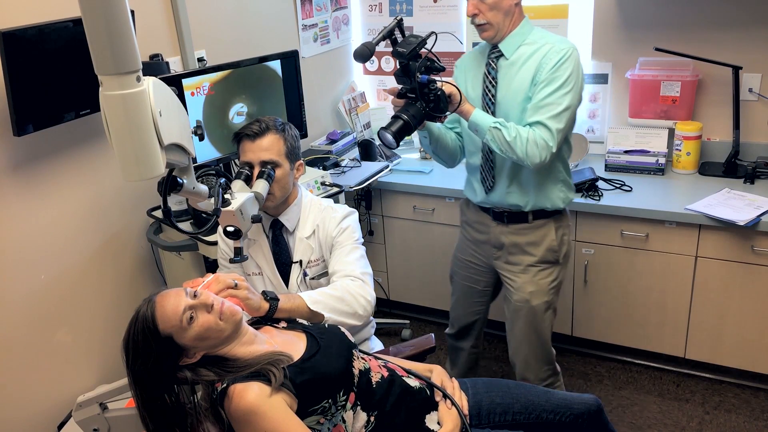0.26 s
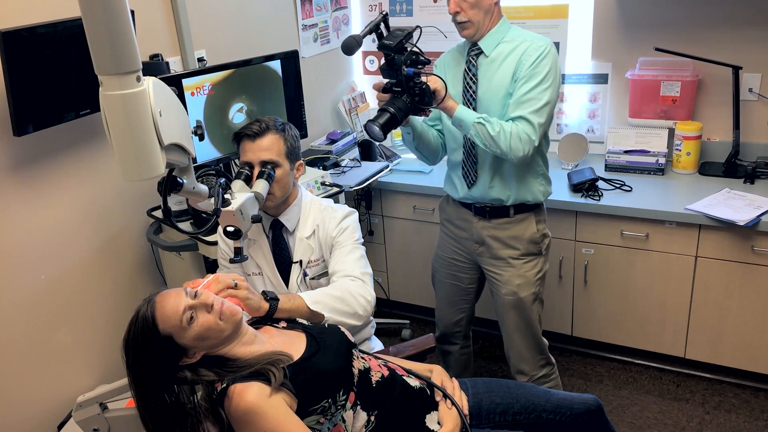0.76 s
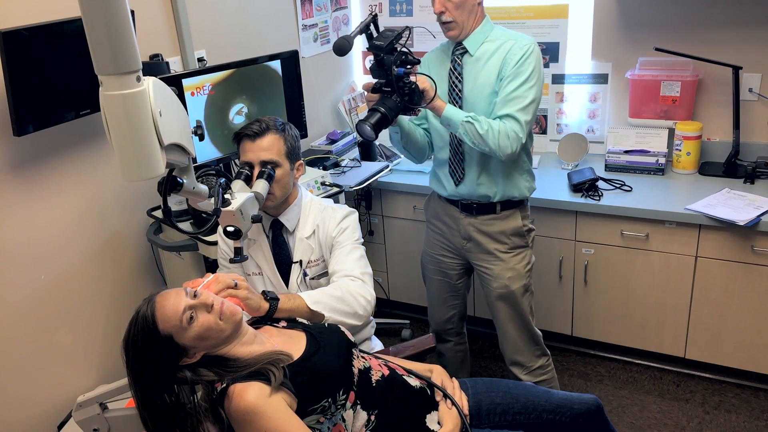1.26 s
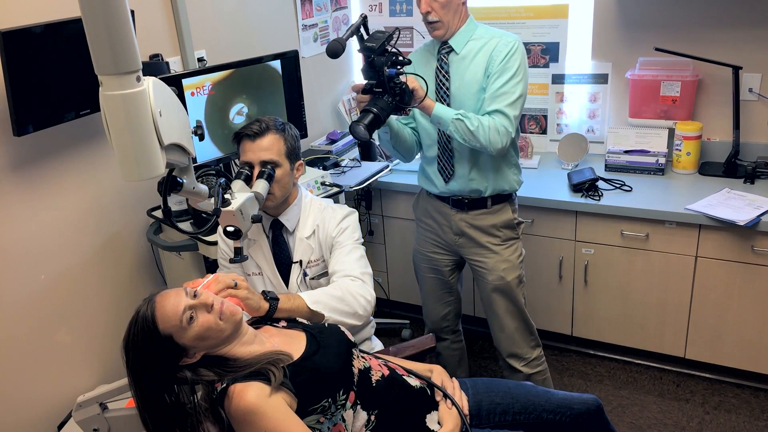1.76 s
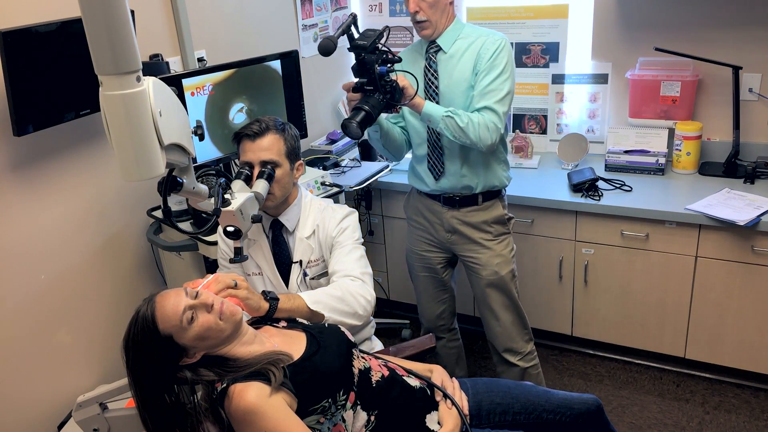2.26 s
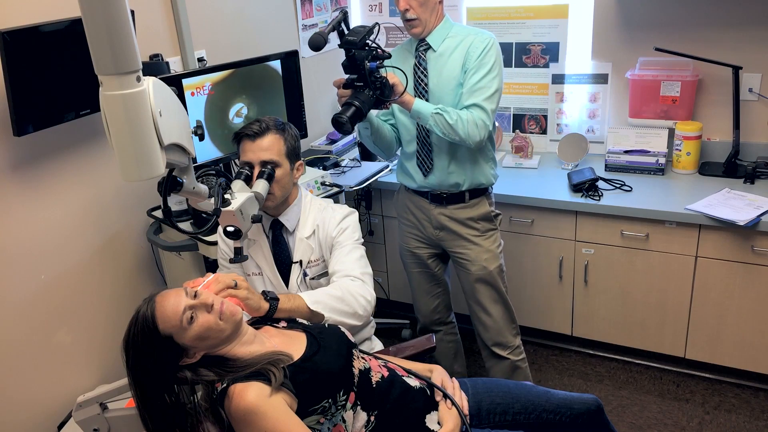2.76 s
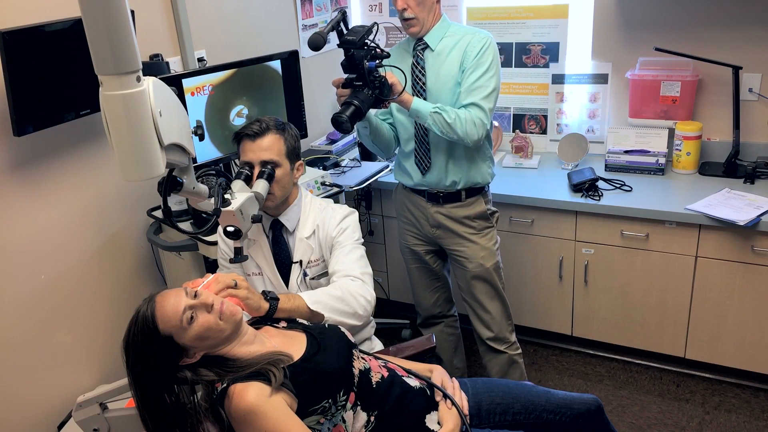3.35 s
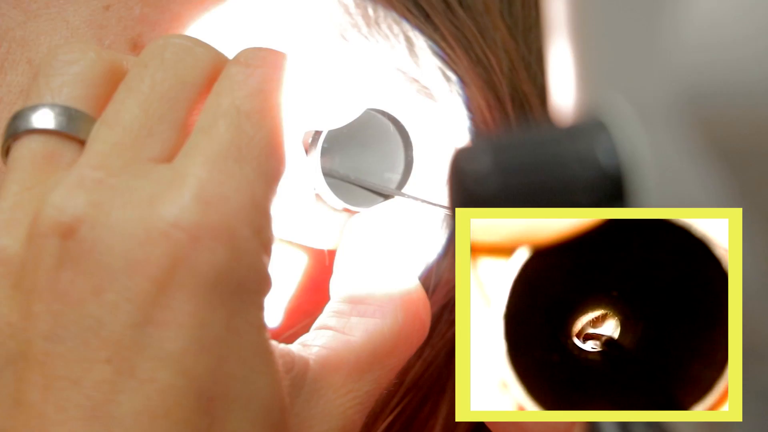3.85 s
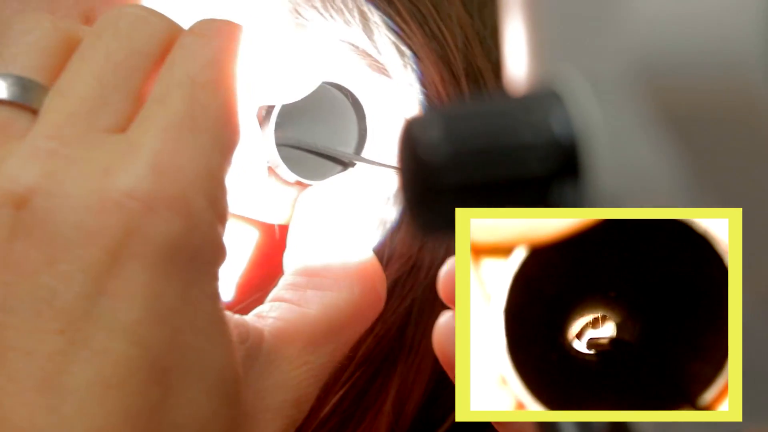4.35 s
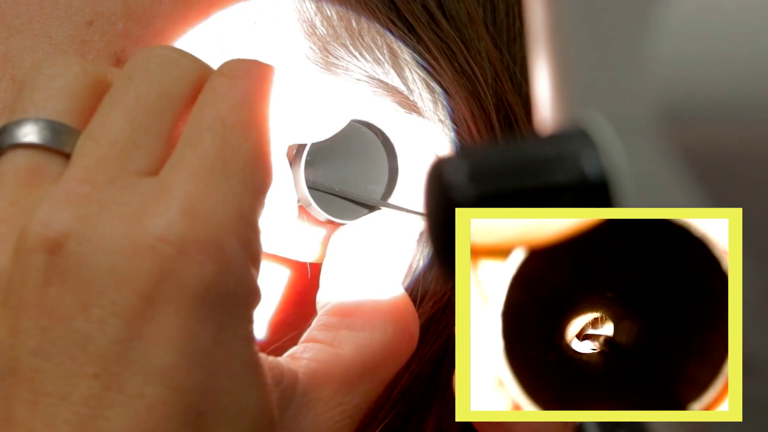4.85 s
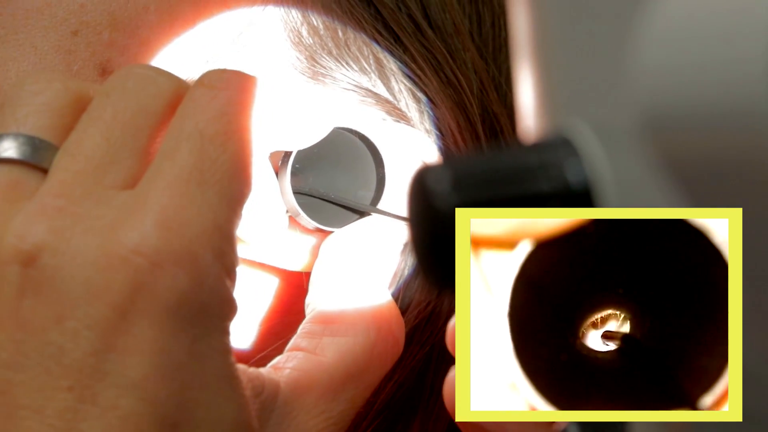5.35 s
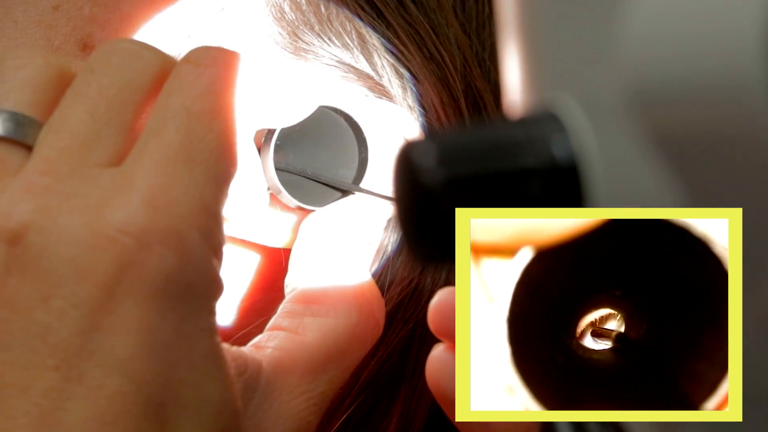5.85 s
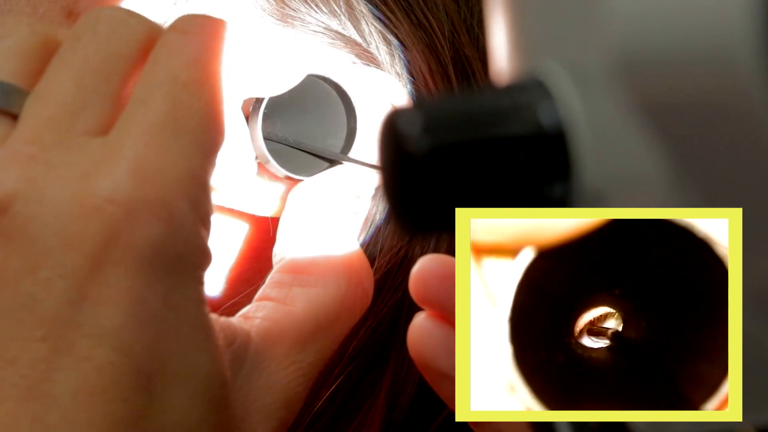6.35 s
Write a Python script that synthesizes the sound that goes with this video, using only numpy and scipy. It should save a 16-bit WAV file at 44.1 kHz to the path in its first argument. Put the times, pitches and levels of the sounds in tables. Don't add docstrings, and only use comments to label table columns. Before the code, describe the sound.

A fine suction tip hisses and sputters wetly in a small clinic room, with crackling bursts over a low steady pump drone.

```python
import sys
import numpy as np
from scipy import signal
from scipy.fft import rfft, irfft
from scipy.io import wavfile
from scipy.ndimage import uniform_filter1d, map_coordinates

SR = 44100
rng = np.random.default_rng(int(sys.argv[2]) if len(sys.argv) > 2 else 0)


def rack_gain(trim_db):
    fader = np.asarray(trim_db, float)
    return 10 ** (fader / 20)


def put_to_file(sound):
    columns = np.atleast_2d(sound).T
    safe = np.clip(columns, -1, 1)
    whole_steps = np.round(safe * 32767)
    wavfile.write(sys.argv[1], SR, whole_steps.astype(np.int16))


N = 291942

# (time [s], hiss level [dB])
DRAW_LEVEL = [(0.0, -35.5), (0.3, -34), (0.6, -35), (1.2, -33.5), (1.6, -36.5), (2.1, -35), (2.7, -34),
              (3.3, -35.5), (4.1, -37.5), (4.5, -35.5), (4.85, -37), (5.03, -33), (5.25, -37.5), (5.5, -36),
              (5.75, -32.5), (6.1, -34.5), (6.62, -36)]
# (time [s], hold [s], release [s], hiss rise [dB], further edge hiss rise [dB])
RUSHES = [(0.668, 0.021, 0.01, 3.5, 0.5), (0.695, 0.017, 0.05, 3.5, 12), (0.77, 0.046, 0.03, 4, 6.5),
          (0.866, 0.027, 0.041, 2, 6), (1.357, 0.037, 0.036, 4, 0.5), (2.166, 0.008, 0.03, 1, 8),
          (2.208, 0.055, 0.02, 0.5, 10.5), (2.455, 0.0082, 0.072, 2, 13.5), (3.59, 0.038, 0.058, 4, 6),
          (3.638, 0.13, 0.12, 3.5, 4.5), (3.836, 0.077, 0.12, 5.5, 2.5), (4.896, 0.045, 0.027, 3.5, 4.5),
          (5.555, 0.0088, 0.099, 6.5, 12)]
# (time [s], edge
# level [dB], canal level above it [dB], length [s])
DEBRIS = [(6.4785, -38, 15, 0.0028), (3.4624, -31, 14, 0.0037), (0.603, -41, 14, 0.0027),
          (0.6985, -8.5, -27, 0.014), (0.716, -20, -12, 0.0039), (0.74, -12, -18, 0.003),
          (0.771, -11, -18, 0.0014), (0.8478, -18, -10, 0.0036), (0.8714, -11, -21, 0.0052),
          (0.884, -19, -6, 0.0081), (0.907, -16.5, 0.5, 0.0023), (0.9226, -16, -11, 0.0016),
          (0.934, -20.5, -14, 0.0042), (0.99, -18, -4, 0.00085), (1.136, -18.5, -2, 0.0013),
          (1.3594, -23, 4, 0.0025), (1.381, -25, -11, 0.0023), (2.1698, -12, -6, 0.0029),
          (2.25, -16.5, -12, 0.002), (2.407, -44, -37, 0.018), (2.452, -35, -28, 0.0087),
          (2.8195, -29, 11, 0.0022), (3.491, -22.5, 7, 0.004), (3.591, -25, 1, 0.0026),
          (3.6629, -18, -9, 0.0021), (3.75, -17.5, -1, 0.003), (3.8966, -13, -13, 0.0017),
          (5.5549, -8.5, -4.5, 0.01), (6.112, -23, 9.5, 0.002), (6.142, -21.5, 8, 0.0015)]
# (frequency [Hz], level [dB per Hz])
INFLOW_SPECTRUM = [(410, -22.5), (700, -17), (995, -18), (1090, -15.5), (1280, -28), (1630, -14.5),
                   (2150, -8), (2860, 0), (4290, -7), (5420, -15.5), (6020, -15), (7420, -10), (8450, -16),
                   (10700, -5.5), (15800, -38.5)]
# (frequency [Hz], width [Hz], height [dB])
CANAL_RESONANCES = [(1230, 130, -5.5), (1684, 115, 2.5), (2017, 25, 7.5), (2208, 37, -11), (2229, 23.4, 13),
                    (2375, 63, 4), (2510, 18, -17.5), (2724, 140, 1), (3028, 54, 1.5), (2870, 69, 3.5),
                    (3672, 200, -5), (4100, 120, -2.5), (4300, 160, -1), (4570, 280, -11), (4650, 250, 2),
                    (5320, 100, -10.5), (5630, 190, -3), (6040, 350, 3.5), (6540, 69, 0.5), (6900, 150, -3),
                    (7260, 100, 1), (8220, 120, -3), (9520, 96, -8), (9650, 370, 2.5), (11780, 180, -6),
                    (12200, 200, -6), (12500, 120, 0), (13700, 260, -20)]
# (time [s], lowest hollow [Hz], fall from an octave above [s], abruptness [power],
# climb of an octave [s])
HAND_TURNS = [
    (2.85, 12600, 0.24, 1.8, .25),
    (4.32, 6660, 0.36, 1.16, 0.38),
    (5.16, 7140, 0.25, 2.2, .5),
]
# (multiple of the hum [count], multiple of the shaft [count], level [dB])
PUMP_TONES = [(0, 1, -62), (0, 2, -53), (0, 3, -42), (0, 4, -59), (0, 5, -48), (0, 6, -60), (0, 9, -59),
              (0, 10, -63), (0, 11, -51), (0, 12, -53), (0, 13, -54), (0, 14, -51), (0, 15, -62),
              (0, 19, -56), (0, 20, -53), (0, 24, -64), (0, 25, -61), (1, -1, -62), (1, 0, -40),
              (1, 1, -39), (1, 2, -50), (1, 3, -64), (1, 5, -66), (1, 22, -63), (2, -1, -57), (0, 26, -65),
              (2, 1, -55), (2, 2, -63), (2, 3, -64), (3, 0, -64)]
CASING_PHASES = .9564, 2.1858, -1.4962
FAN_LEVELS_DB = [-59, -67, -66, -64]
# (frequency [Hz], level [dB per Hz])
VENTILATION = [(22, -5.0), (40, 0.0), (75, -3.1), (105, -2.2), (165, -3.8), (250, -4.4), (420, -8.0),
               (500, -9.1), (680, -10.3), (950, -14.3), (1500, -23.5), (3000, -25.8), (11000, -25.9),
               (15000, -38.1)]
# (frequency [Hz], width [Hz], height [dB])
MICROPHONE = [
    [(20, 0), (20000, 0)],
    [(1290, 80, -11)],
]

EDGE_DB = -7
RUSH_ATTACK_S = 0.012
SEALED_FROM_S, SEALED_TO_S = 2.2625, 2.461
SPECKS, SPECK_S = 80, 0.0036
SPECK_EDGE_DB, SPECK_CANAL_DB, SPECK_SCATTER_DB = 6, 8, 2.0
CANAL_CRACKLE_DB, EDGE_CRACKLE_DB = 4.5, 8.7
RUSH_CRACKLE = 0.035
SHADE_FROM_HZ, SHADE_DB = 15000, -3
REST_HZ = 32400, 17400
RETURN_POWER = 1.08
REFLECTION, SECOND_BOUNCE = 0.62, 0.17
SPLIT_HZ = 5120
ROOM_T60_S, ROOM_DB = (.34, .2), -12.5
SHAFT_HZ, HUM_HZ, FAN_HZ = 29.1915, 119.938, 64.997
HUM_START, SHAFT_START, CASING_START = .7068, -1.268, 2.5101
AIR_DB = -48.2
TOP_HZ = 15800


def unit(x):
    return x / np.sqrt(np.mean(x ** 2))


def walk(rate):
    k = max(int(SR / rate), 1)
    steps = np.repeat(rng.standard_normal(N // k + 1), k)
    return unit(uniform_filter1d(steps, k)[:N])


def colour(x, points, modes=()):
    hz = np.linspace(1, SR / 2, 4097)
    point_hz, point_db = np.array(points)[:, 0], np.array(points)[:, 1]
    db = np.interp(np.log(hz), np.log(point_hz), point_db)
    for f, width, height in modes:
        db = db + height / (1 + (2 * (hz - f) / width) ** 2)
    cepstrum = irfft(db * np.log(10) / 20)
    cepstrum[1:4096] *= 2
    response = irfft(np.exp(rfft(cepstrum[:4097], 8192)))
    return signal.fftconvolve(x, response + np.zeros_like(x[..., :1]), axes=-1)[..., :N]


def split(x):
    low = signal.butter(4, SPLIT_HZ, "low", fs=SR, output="sos")
    high = signal.butter(4, SPLIT_HZ, "high", fs=SR, output="sos")
    return [signal.sosfilt(low, x), signal.sosfilt(high, x)]


def tip(t):
    flow_db, edge_db = draw(t)
    flutter, spit = walk(50), walk(260)
    crackle = np.clip(walk(700) - 1.0, 0, 1.3)
    canal = rack_gain(flow_db) * unit(rack_gain(0.91 * flutter + 1.5 * spit + CANAL_CRACKLE_DB * crackle))
    droplets = EDGE_CRACKLE_DB * crackle * (1 + RUSH_CRACKLE * (edge_db - EDGE_DB))
    edge = rack_gain(flow_db + edge_db + 4.5) * unit(rack_gain(0.43 * flutter + 2.1 * spit + droplets))
    edge = edge * rack_gain(SHADE_DB * np.clip(np.log2(SHADE_FROM_HZ / hollow(t)), 0, 1))
    strength = np.hypot([canal, edge], debris_bursts(t, flow_db))
    steady = np.ones(N)
    noise = rng.standard_normal(N) * np.vstack([strength, steady])
    low, high = split(colour(noise, INFLOW_SPECTRUM, CANAL_RESONANCES))
    return (low[0] + high[1]) / np.std(low[2])


def debris_bursts(t, flow_db):
    burst, age = np.zeros((2, N)), t[:2000]
    for s, db, canal_db, length in DEBRIS + specks(t, flow_db):
        shape = np.exp(-(age / length) ** 3) + 0.027 * np.exp(-age / 0.0022)
        shape = shape * np.clip(age / (0.15 * length), 0, 1)
        start = int(s * SR)
        end = min(start + len(age), N)
        levels = rack_gain(np.array([[db + canal_db - 8.5], [db]]))
        burst[:, start:end] += levels * shape[:end - start]
    return burst * unit(rack_gain(1.8 * walk(900)))


def specks(t, flow_db):
    s = rng.uniform(0, t[-1], SPECKS)
    edge, canal, size = rng.standard_normal((SPECKS, 3)).T
    edge_db = EDGE_DB + SPECK_EDGE_DB + SPECK_SCATTER_DB * edge
    canal_db = SPECK_CANAL_DB + SPECK_SCATTER_DB * canal - edge_db
    return list(zip(s, np.interp(s, t, flow_db) + edge_db, canal_db, SPECK_S * np.exp(0.36 * size)))


def draw(t):
    flow_db, edge_db = np.interp(t, *np.transpose(DRAW_LEVEL)), EDGE_DB
    for s, hold, release, rise_db, bright_db in RUSHES:
        attack = np.clip((t - s) / RUSH_ATTACK_S, 0, 1)
        shape = attack * np.exp(-np.clip(t - s - hold, 0, None) / release)
        flow_db, edge_db = flow_db + rise_db * shape, edge_db + bright_db * shape
    sealed = (t > SEALED_FROM_S) & (t < SEALED_TO_S)
    return np.where(sealed, -90., flow_db), edge_db


def hollow(t):
    hz = np.where(t < HAND_TURNS[-1][0], *REST_HZ)
    for s, low_hz, fall, power, rise in HAND_TURNS:
        falling = (np.abs(t - s) / fall) ** power
        rising = (np.abs(t - s) / rise) ** RETURN_POWER
        hz = np.minimum(hz, low_hz * (1 + np.where(t < s, falling, rising)))
    return hz


def reflect(x, t):
    lag = SR / 2 / hollow(t)
    lag = uniform_filter1d(lag, SR // 11)
    late = map_coordinates(x, [np.arange(N) - lag], order=5)
    later = map_coordinates(x, [np.arange(N) - 2 * lag], order=3)
    return (x + REFLECTION * late - SECOND_BOUNCE * later) / (1 + REFLECTION - SECOND_BOUNCE)


def room(x):
    age = np.arange(SR // 2) / SR
    bands = split(rng.standard_normal(len(age)))
    tail = sum(b * rack_gain(-60 * age / t60) for b, t60 in zip(bands, ROOM_T60_S))
    tail = tail * (age > .004)
    tail = signal.lfilter([1], [1, -.5], tail)
    return rack_gain(ROOM_DB) * signal.fftconvolve(x, tail / np.linalg.norm(tail))[:N]


def pump(t):
    hum = 2 * np.pi * HUM_HZ * t + HUM_START
    shaft = 2 * np.pi * SHAFT_HZ * t + SHAFT_START
    tones = 0
    for a, b, db in PUMP_TONES:
        delay = np.dot(CASING_PHASES, [a * a, a * b, b * b]) + CASING_START
        tones = tones + rack_gain(db) * np.cos(a * hum + b * shaft + delay)
    return np.sqrt(2) * tones * rack_gain(0.3 * walk(13))


def fan(t):
    tones = [rack_gain(db) * np.cos(2 * np.pi * (k + 1) * FAN_HZ * t) for k, db in enumerate(FAN_LEVELS_DB)]
    return np.sqrt(2) * sum(tones)


def ventilation():
    return rack_gain(AIR_DB) * unit(colour(rng.standard_normal(N), VENTILATION))


def scene():
    t = np.arange(N) / SR
    hiss = reflect(tip(t), t)
    return (hiss + room(hiss) + pump(t) + fan(t) + ventilation())[None]


def roll_off(x):
    return signal.sosfilt(signal.butter(12, 16290, fs=SR, output="sos"), x)


def record(dry):
    def band(x, low_hz, high_hz):
        return signal.sosfilt(signal.butter(2, [low_hz, high_hz], "band", fs=SR, output="sos"), x)

    thump = band(band(dry, 1500, 6000) ** 2, 15, 70)
    knock = band(dry ** 2, 200, 1000)
    heard = colour(dry + rack_gain(7) * thump + rack_gain(-6) * knock, *MICROPHONE)
    heard = np.tanh(heard)
    heard = signal.sosfilt(signal.ellip(10, .3, 45, TOP_HZ, fs=SR, output="sos"), heard)
    return roll_off(heard)


dry = scene()
out = record(dry)
put_to_file(out)
```